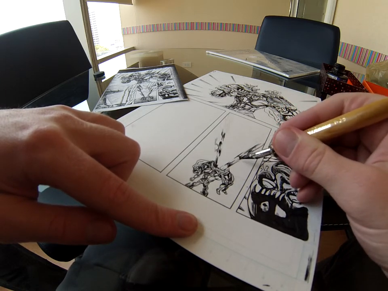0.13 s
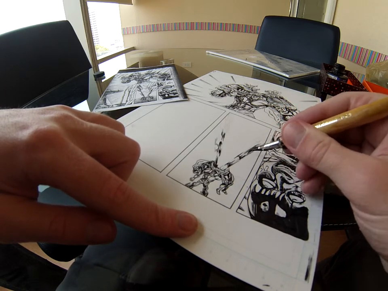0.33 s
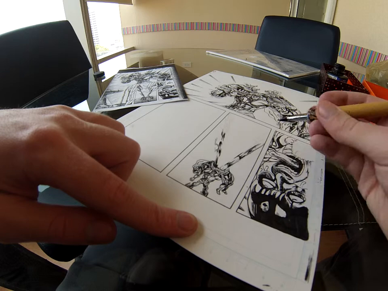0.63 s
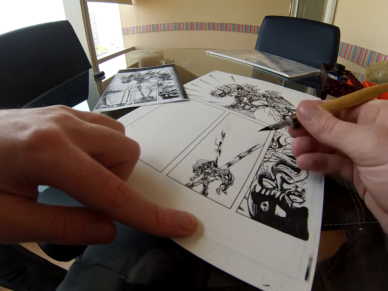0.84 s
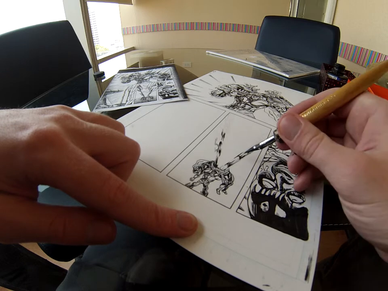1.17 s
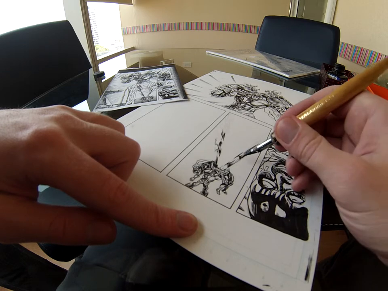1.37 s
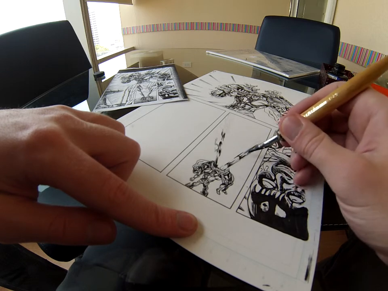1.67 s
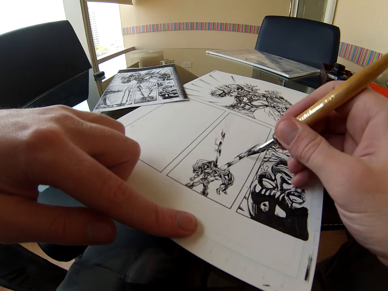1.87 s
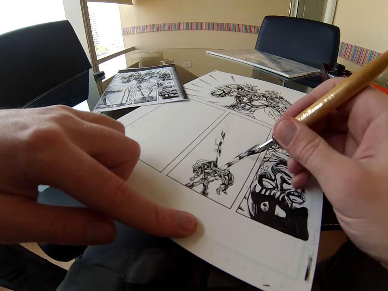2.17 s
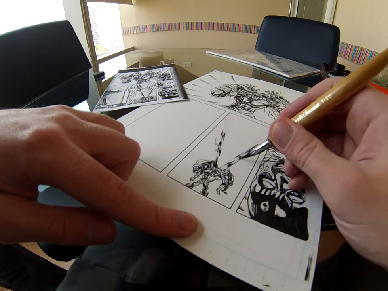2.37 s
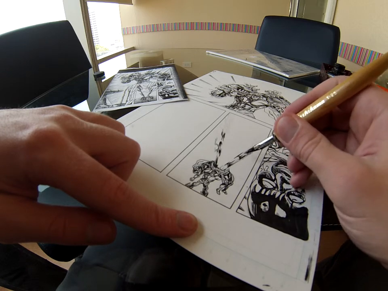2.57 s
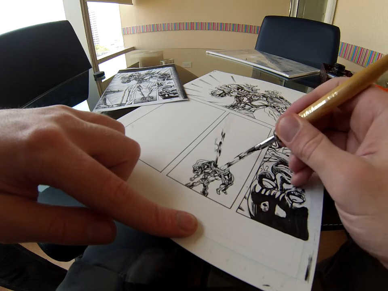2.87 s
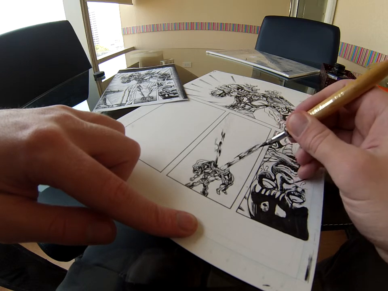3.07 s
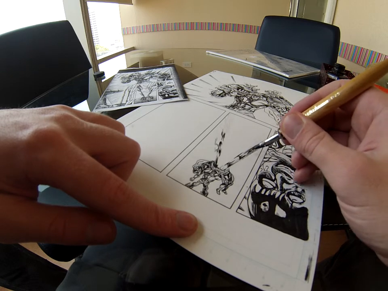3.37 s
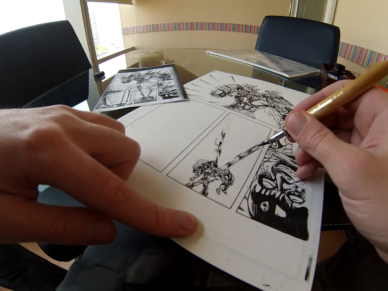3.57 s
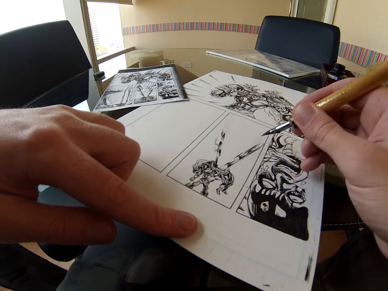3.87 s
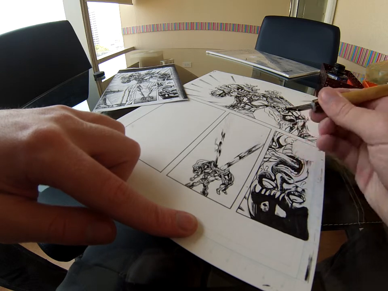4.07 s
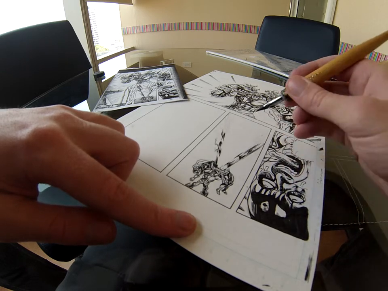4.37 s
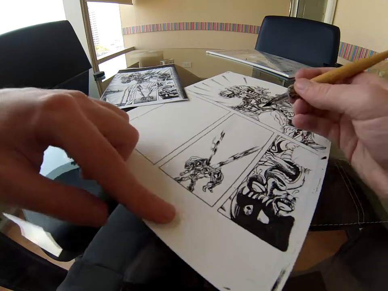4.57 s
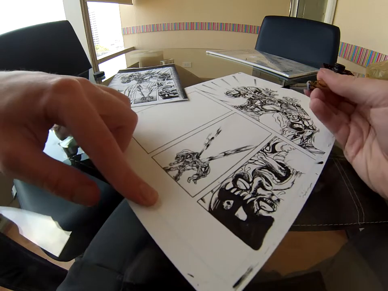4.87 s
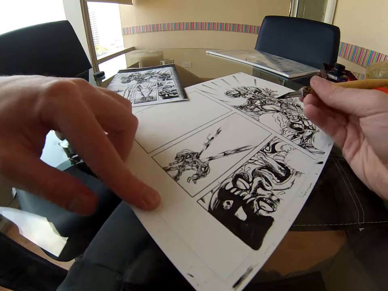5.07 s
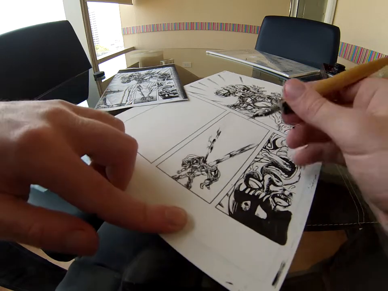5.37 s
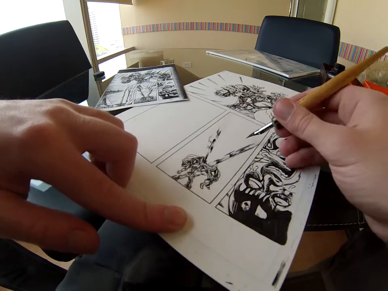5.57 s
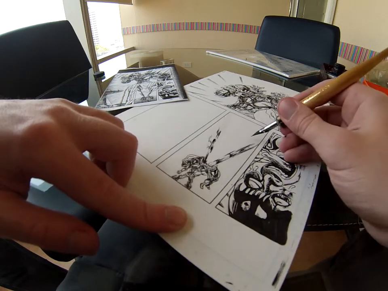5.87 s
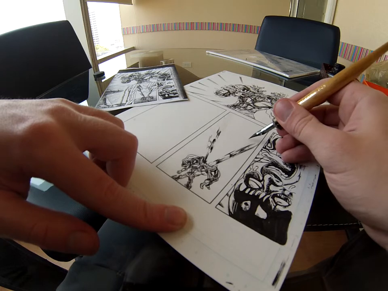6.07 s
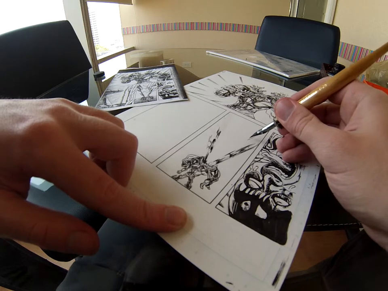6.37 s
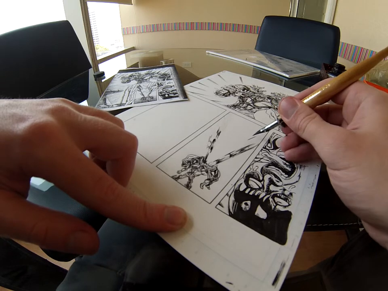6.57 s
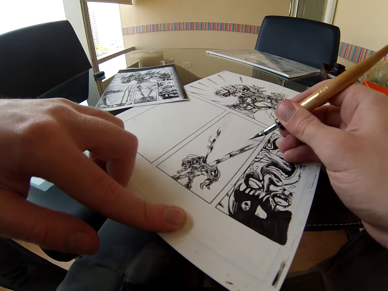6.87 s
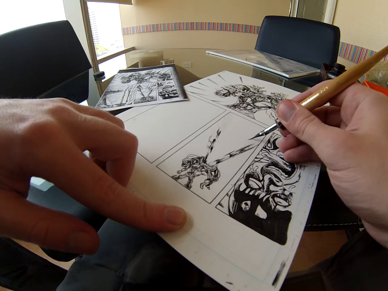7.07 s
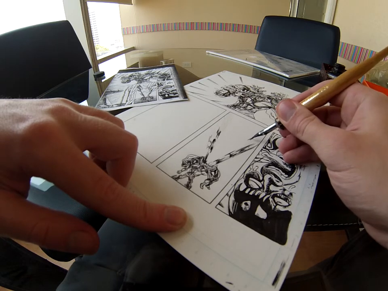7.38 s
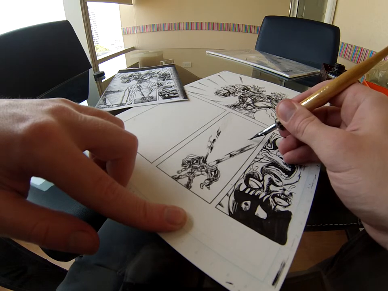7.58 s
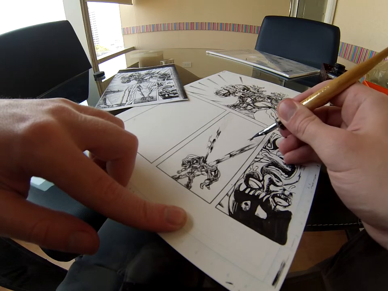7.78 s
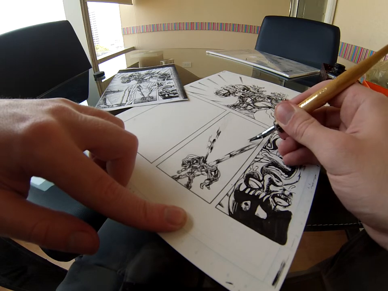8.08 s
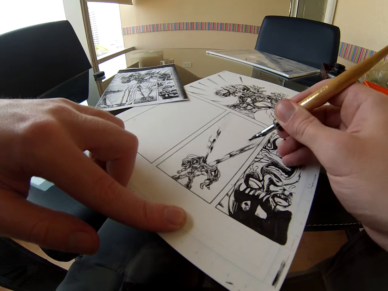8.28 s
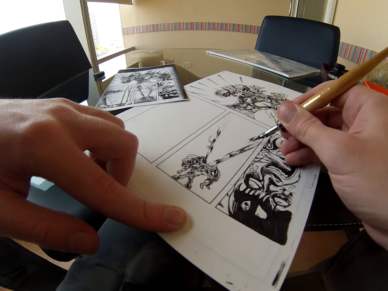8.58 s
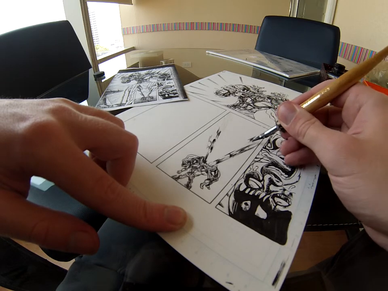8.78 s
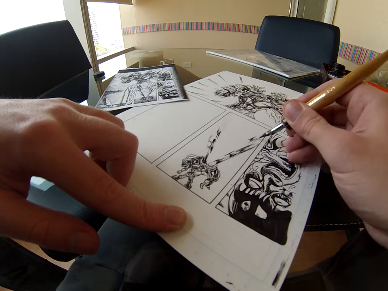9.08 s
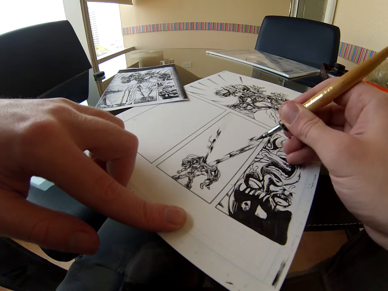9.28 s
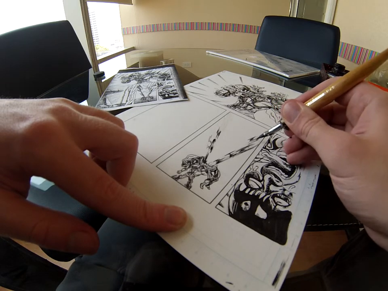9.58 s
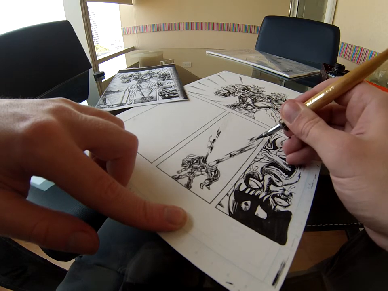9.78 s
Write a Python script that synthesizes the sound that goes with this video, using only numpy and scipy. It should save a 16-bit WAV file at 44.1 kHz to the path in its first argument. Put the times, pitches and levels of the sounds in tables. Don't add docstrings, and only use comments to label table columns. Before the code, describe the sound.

A metal dip pen hatches on stiff paper close to a small camera microphone. About nine crisp, raspy strokes come in steady rhythm, then a pause with soft paper rustle, crackles and snaps as a hand shifts the sheet. A few fainter strokes follow, then another regular run until the end. Low ventilation rumble and faint hiss continue throughout in a small room.

```python
import sys
import numpy as np
from scipy import signal
from scipy.fft import rfft, irfft
from scipy.io import wavfile
from scipy.ndimage import uniform_filter1d

SR = 44100
rng = np.random.default_rng(int(sys.argv[2]) if len(sys.argv) > 2 else 0)


def transcribe(signal):
    frames = np.atleast_2d(signal).T
    limited = np.clip(frames, -1, 1)
    pcm = np.round(limited * 32767).astype(np.int16)
    wavfile.write(sys.argv[1], SR, pcm)


def volts(x):
    e = np.asarray(x, float) / 20
    return 10 ** e


N = 437472

# time in seconds, level in dB.
AIR_FLOW = [(0.0, -39.5), (1.1, -41.5), (1.21, -49), (1.35, -36.5), (1.41, -43), (3.37, -41), (3.42, -38),
            (4.42, -41), (4.75, -46), (4.86, -33.5), (4.92, -51), (4.97, -41), (6.6, -41.5), (6.99, -36.5),
            (7.15, -42), (9.92, -42.5)]
# loudest moment, rise and fall in seconds, level in dB.
DRONE_SWELLS = [
    (2.42, .14, .14, -46),
    (3.62, .3, 0.33, -45.5),
    (9.31, 0.21, .12, -45.5),
]
# pitch in Hz, width in Hz, level in dB.
ROOM_MODES = [(81.2, 12.2, -52.5), (105.5, 22, -54), (208.6, 67, -54), (252.4, 15.5, -53.5),
              (277.5, 13.7, -56), (320.2, 12, -54), (354.4, 16.5, -57.5), (392.6, 40.5, -54.5),
              (437.1, 18.6, -61.5), (484.2, 41, -60.5), (678, 5.5, -78), (697, 6.7, -72.5), (954, 110, -81)]
# frequency in Hz, density in dB per Hz.
AIR_SPECTRUM = [(35, -47), (60, 1.5), (81, -14.5), (304, -7.5), (349, -27.5), (430, -16), (517, -24.5),
                (922, -31.5), (1220, -36.5), (1760, -38.5), (2170, -40.5), (11200, -53), (15200, -54.5)]

# start in seconds, peak in dB, pitch in Hz.
KNOCKS = [
    (.089, -56, 905),
    (.782, -53, 915),
    (5.954, -53, 1460),
    (7.624, -57, 2180),
    (9.554, -55.5, 1490),
]
# start in seconds, peak in dB, pitch in Hz.
NIB_TICKS = [(1.265, -53, 7900), (1.5279, -51, 8200), (1.8587, -56, 7100), (2.365, -55, 6910),
             (2.6464, -55, 6810), (2.9088, -56, 6850), (3.1438, -54, 7320), (3.1782, -50, 6800),
             (3.3714, -57, 7200), (5.8194, -62, 7640), (6.1399, -59, 7160), (6.3714, -65, 7070),
             (6.5487, -57, 7630), (7.3245, -58, 7350), (7.5757, -61, 7010), (7.7792, -61, 6810),
             (8.0375, -52, 7840), (8.287, -45, 7750), (8.4801, -55, 7420), (8.7091, -55, 7710),
             (8.94, -51, 7590), (9.1685, -50, 8060), (9.3651, -59, 9390), (9.7442, -58, 7300)]
# start in seconds, peak in dB, pitch in Hz.
CRACKLES = [
    (3.8427, -49, 10800),
    (3.8484, -49, 10800),
    (4.9861, -54, 7400),
    (5.1316, -51, 7680),
    (5.136, -52, 10500),
    (5.257, -59, 9370),
    (5.4994, -59, 11300),
    (5.5994, -58, 11700),
    (6.7406, -60, 11300),
]
# start in seconds, peak in dB, pitch in Hz.
SNAPS = [
    (4.32, -56, 3000),
    (4.986, -50, 4200),
    (6.616, -45, 3900),
    (8.99, -45, 4300),
]

# fastest moment, speeding up and slowing down in seconds,
# hiss in dB, papery body in dB.
HAND_SLIDES = [(.485, .03, .05, -69, -79), (1.08, .08, .1, -79, -78), (3.845, .02, 0.072, -69, -65),
               (4.28, .2, .22, -78, -66), (4.66, .1, .08, -78, -78), (4.985, .2, .12, -76, -64.5),
               (5.135, .03, .07, -74, -80), (5.4, .1, .3, -78, -78), (5.84, .06, .05, -78, -74),
               (7.0, .1, .3, -82, -78), (7.75, .1, .05, -83, -73)]
# fastest moment in seconds, hiss in dB.
NIB_SKIMS = [(1.76, -78), (2.03, -75), (2.27, -72), (2.565, -70), (2.825, -72), (3.085, -70), (3.315, -72),
             (6.08, -80), (7.94, -80), (8.2, -79), (8.42, -82), (8.64, -80), (8.88, -78), (9.11, -78),
             (9.33, -77), (9.53, -84), (9.72, -78)]

# fastest moment, speeding up and slowing down in seconds, tine ring in dB,
# weight on the sheet in dB.
STROKES = [(1.334, .055, .05, -63, 0), (1.614, 0.051, .05, -55.5, 2.5), (1.912, 0.058, .045, -56, 1.5),
           (2.152, 0.047, .05, -52, 2.5), (2.432, 0.069, .05, -52, 2.5), (2.708, 0.069, 0.058, -52, 0.5),
           (2.963, 0.051, .055, -54, 0.5), (3.203, 0.059, .05, -53.5, 0), (3.411, .012, .042, -55, -8.5),
           (5.965, .05, 0.053, -62, 2), (6.205, .045, .035, -63.5, 1), (6.421, .05, .045, -68.5, -1),
           (7.4, .035, .035, -71, 0), (7.61, .04, .04, -70, -2), (7.834, .045, .038, -60.5, 1.1),
           (8.078, .045, .036, -61.5, 1.1), (8.3, .016, .05, -65.5, -5), (8.527, .04, .04, -60, 1.5),
           (8.755, .052, .038, -60.5, 1.5), (8.992, 0.052, .045, -56, 0.5), (9.223, .045, .042, -58.5, 2.2),
           (9.418, .04, .045, -64, 1), (9.611, .035, .04, -67.5, 1), (9.811, .045, .045, -68.5, 1)]
# pitch in Hz, width in Hz, level in dB.
TINE_MODES = [(5170, 400, -2.3), (5540, 290, -2.3), (6560, 300, -0.6), (7200, 570, -7.5)]
# pitch in Hz, width in Hz, level in dB.
GRIT_MODES = [(8250, 2100, 4.5), (10900, 1400, 3.5), (12800, 1400, 0), (14600, 1000, 0)]
# pitch in Hz, width in Hz, level in dB.
SHEET_MODES = [(965, 410, -8.5), (1540, 500, -8), (1900, 330, -5.5), (2850, 400, -3), (3420, 500, -2.5),
               (3860, 560, -0.5), (4150, 260, 2.5), (4480, 650, -4.5)]

# level in dB against the tine ring, extra dB per dB of strength,
# lateness in seconds, sharpness of the arch, steady drag of mere contact in dB.
TINE_LAW = (-3.1, 0.02, 0.0005, 2.2, -9.5)
GRIT_LAW = (-5.8, -.15, 0.001, 2.4, -11)
SQUEAK_LAW = (-4.5, -.3, .003, 1.5, -9)
SHEET_LAW = (-0.4, -0.05, -.003, 2.9, -16)
# level in dB, extra dB per dB of strength,
# lateness, rise and fall in seconds.
LIFT_LAW = (-21, -.1, .05, .02, .12)
SETTLE_LAW = (-11, -.5, .05, .03, .14)
FIRM_DB = -60

# loudest moment, rise and fall in seconds, level in dB.
WHINE_SWELL = [
    (7.6, .3, 0.59, -70.5),
]
THIN_MOMENTS = [.37, .55, .6, .88, 1.0, 1.12, 3.52, 3.76, 3.8, 3.99, 4.155, 4.265, 5.245, 5.55, 5.7, 6.16,
                6.51, 6.535, 6.77, 6.97, 7.28, 7.34, 7.705, 7.915, 8.465, 8.9, 9.87, 9.9]
# frequency in Hz, density in dB per Hz.
SIDE_HISS_SPECTRUM = [(300, -15), (600, -7.5), (1500, -4.5), (4700, 2.5), (10000, 0.5), (15000, -7)]


def level(x, db):
    return x * volts(db) / np.sqrt(np.mean(x ** 2))


def band(x, hz, width):
    return signal.lfilter(*signal.iirpeak(min(hz, .45 * SR), hz / width, fs=SR), x)


def double_band(x, hz, width):
    return band(band(x, hz, width), hz, width)


def modes(x, table):
    return sum((-1) ** k * volts(db) * band(x, hz, width) for k, (hz, width, db) in enumerate(table))


def shape(x, table):
    hz, db = np.transpose(table)
    f = np.fft.rfftfreq(N, 1 / SR) + 1
    return irfft(rfft(x) * volts(np.interp(np.log(f), np.log(hz), db)), N)


def noise():
    return rng.standard_normal(N)


def walk(rate):
    hold = int(SR / rate)
    steps = np.repeat(rng.standard_normal(N // hold + 1), hold)
    return 1.5 * uniform_filter1d(uniform_filter1d(steps, hold), hold)[:N]


def arches(rows, sharpness):
    gain, t = np.zeros(N), np.arange(N) / SR
    for s, rise_s, fall_s, db in rows:
        on = slice(max(int((s - rise_s) * SR), 0), int((s + fall_s) * SR))
        place = (t[on] - s) / np.where(t[on] < s, rise_s, fall_s)
        gain[on] += volts(db) * np.cos(np.pi / 2 * np.clip(place, -1, 1)) ** sharpness
    return gain


def ventilation():
    flow_db = np.interp(np.arange(N) / SR, *np.transpose(AIR_FLOW))

    def resonance(hz, width):
        return level(double_band(noise(), hz, width), 0)

    throb = volts(flow_db - 3.5 + 0.7 * walk(4)) * resonance(52.15, 18)
    drone = (volts(-51) + arches(DRONE_SWELLS, 1.8)) * resonance(147.8, 17)
    sub = volts(flow_db - 3.5 + 0.7 * walk(4)) * resonance(22.9, 12.7)
    out = throb + drone + sub
    for hz, width, db in ROOM_MODES:
        out = out + volts(db + 0.33 * walk(3)) * resonance(hz, width)
    return out + level(shape(noise(), AIR_SPECTRUM), -44.5)


def taps(table, cycles, crack, gain_db):
    out, t = np.zeros(N), np.arange(900) / SR
    grain = rng.standard_normal((len(table), len(t)))
    for (s, db, hz), g in zip(table, grain):
        fall = t * hz / cycles
        ring = np.sin(2 * np.pi * hz * t)
        snap = crack * double_band(g, 1.2 * hz, 1.5 * hz)
        tap = (ring + snap) * np.exp(-fall) * (1 - np.exp(-8 * fall))
        start = int(s * SR)
        out[start:start + len(t)] += volts(db + gain_db) * tap
    return out


def fibres(rate, scatter_db, patchy_db):
    chance = rng.random(N) < rate / SR
    size = volts(scatter_db * rng.exponential(size=N)) * rng.choice([-1, 1], N)
    return chance * size * volts(patchy_db * walk(250))


def after(law):
    over_db, growth, late_s, rise_s, fall_s = law
    return [(s + late_s, rise_s, fall_s, db + over_db + growth * (db - FIRM_DB)) for s, _, _, db, _ in STROKES]


def slides():
    rub = fibres(20000, scatter_db=1.5, patchy_db=1.7)
    skims = [(s, .06, .05, db) for s, db in NIB_SKIMS]
    hand_hiss = [(s, rise, fall, db) for s, rise, fall, db, _ in HAND_SLIDES]
    hand_body = [(s, rise, fall, db) for s, rise, fall, _, db in HAND_SLIDES]
    hiss_gain = arches(skims + hand_hiss, 1.5)
    body_gain = arches(after(SETTLE_LAW) + hand_body, 1.4)
    hiss = level(band(band(rub, 8600, 4500), 8600, 6600), 0.39) * hiss_gain
    return hiss + level(band(rub, 2400, 3500), -1.7) * body_gain


def stroked(law, pressed=False):
    over_db, growth, late_s, sharpness, contact_db = law
    rows = [(s + late_s, rise_s, fall_s, db + over_db + growth * (db - FIRM_DB) + pressed * weight_db)
            for s, rise_s, fall_s, db, weight_db in STROKES]
    drag = volts(contact_db) * arches(rows, .25)
    return arches(rows, sharpness) + drag


def pen():
    plucks = fibres(7000, scatter_db=2.0, patchy_db=1.0)
    chatter = fibres(5000, scatter_db=2.0, patchy_db=1.5)
    tine_gain = stroked(TINE_LAW) + arches(after(LIFT_LAW), 1.3)
    tines = level(modes(plucks, TINE_MODES), 0.93) * tine_gain
    grit = level(modes(plucks, GRIT_MODES), 0.46) * stroked(GRIT_LAW)
    squeak = level(band(band(chatter, 2440, 320), 2440, 1300), -0.3) * stroked(SQUEAK_LAW)
    sheet = level(modes(plucks, SHEET_MODES), 0.95) * stroked(SHEET_LAW, pressed=True)
    nib = squeak - tines - grit - sheet
    for _ in range(2):
        nib = nib - band(nib, 5980, 230)
    return nib


def whine():
    return level(band(noise(), 1480, 39), 0) * arches(WHINE_SWELL, 0.6)


def scene():
    close = pen() + slides()
    close = close + taps(NIB_TICKS + CRACKLES, 4.6, crack=1.7, gain_db=3.5)
    close = close + taps(KNOCKS, 9.6, crack=0.88, gain_db=4.0)
    close = close + taps(SNAPS, 1.6, crack=2.5, gain_db=1.5)
    tail = rng.standard_normal(4000) * np.exp(-np.arange(4000) / SR / 0.016)
    room = volts(-35.5) * signal.fftconvolve(close, tail)[:N]
    return np.tile(close + room + whine() + ventilation(), (2, 1))


def thin_treble(x):
    hz, s, z = signal.stft(x, SR, nperseg=1024)
    strength = uniform_filter1d(np.mean(abs(z), axis=0), size=3, axis=0)
    strength = uniform_filter1d(strength, size=3, axis=1)
    thinned = np.exp(-((s[:, None] - np.array(THIN_MOMENTS)) / 0.017) ** 2).sum(axis=1)
    drift = np.interp(s, np.arange(N) / SR, walk(8))
    threshold = volts(-101.3 + .7 * drift + 5 * thinned)
    keep = np.clip(5 * (strength / threshold - 1) + .5, .04, 1)
    keep[hz < 12800] = 1
    return signal.istft(z * keep, SR, nperseg=1024)[1][:, :N]


def top_cut(x):
    return signal.sosfilt(signal.butter(12, 16450, fs=SR, output="sos"), x)


def record(dry):
    side = level(shape(noise(), SIDE_HISS_SPECTRUM), -77)
    wide = dry + side * np.array([[1], [-1]])
    steep = signal.ellip(10, .2, 70, 15230, fs=SR, output="sos")
    mix = thin_treble(signal.sosfilt(steep, wide))
    return top_cut(mix)


dry = scene()
out = record(dry)
transcribe(out)
```